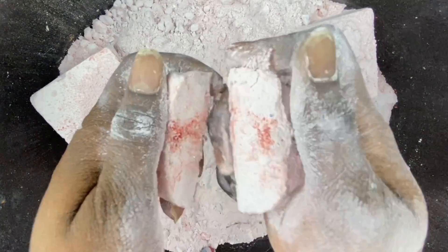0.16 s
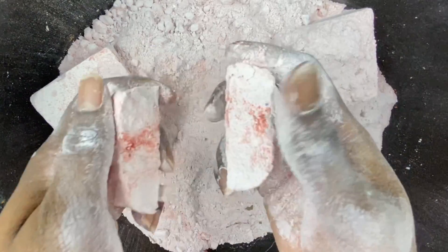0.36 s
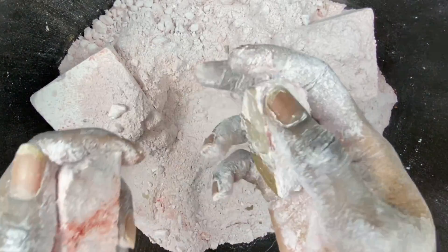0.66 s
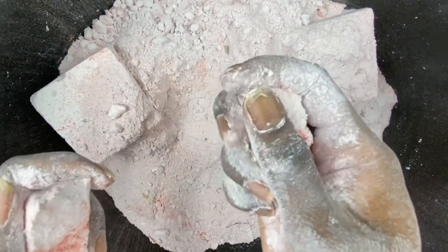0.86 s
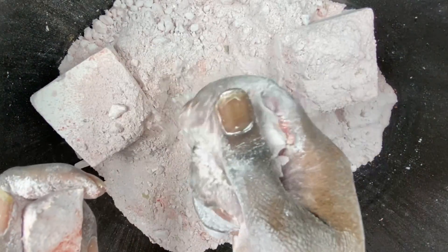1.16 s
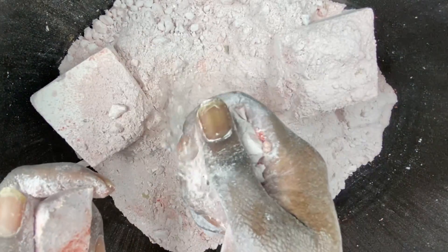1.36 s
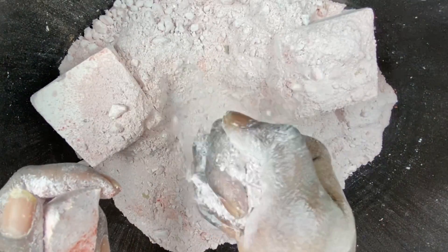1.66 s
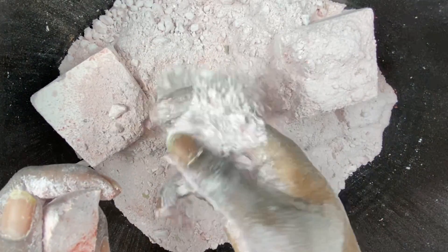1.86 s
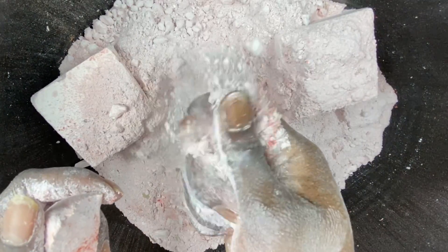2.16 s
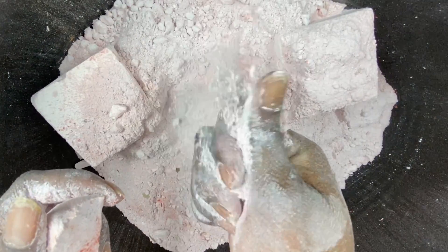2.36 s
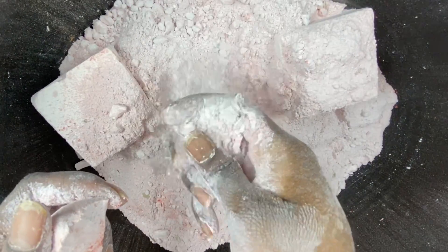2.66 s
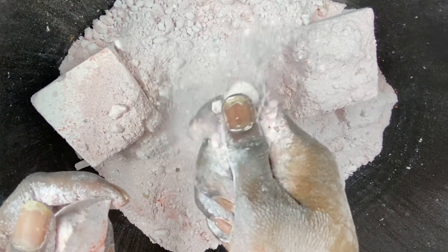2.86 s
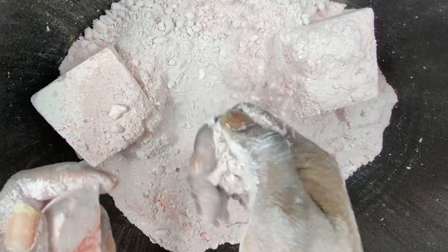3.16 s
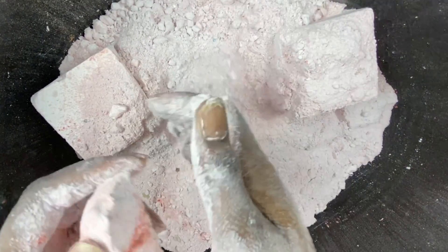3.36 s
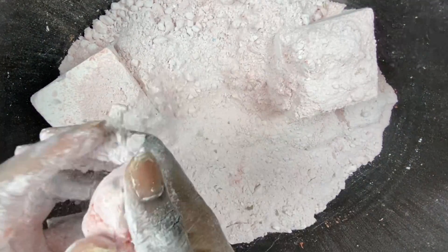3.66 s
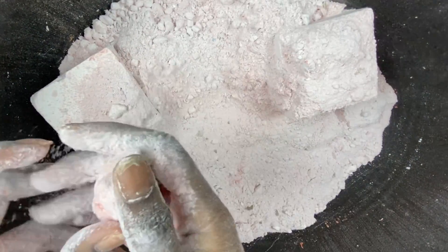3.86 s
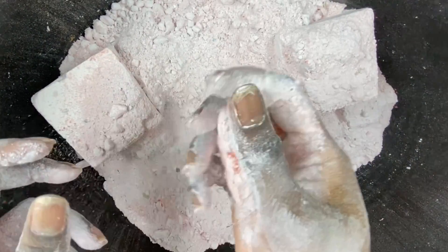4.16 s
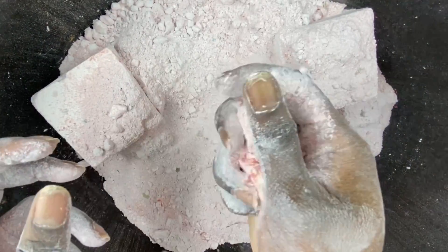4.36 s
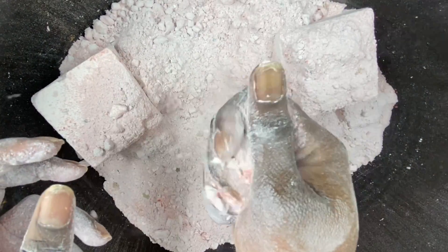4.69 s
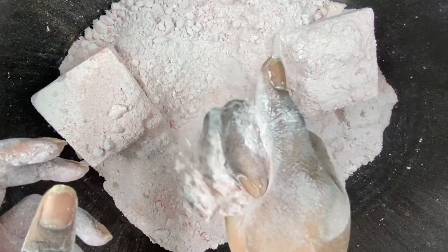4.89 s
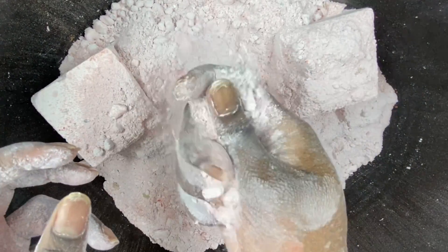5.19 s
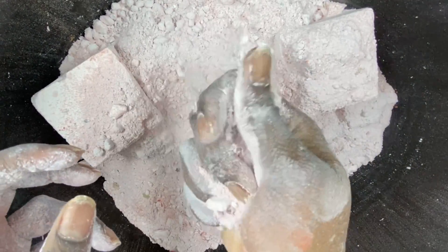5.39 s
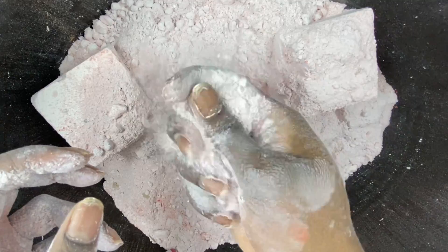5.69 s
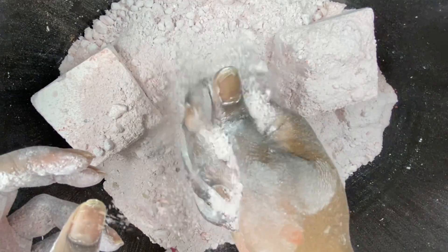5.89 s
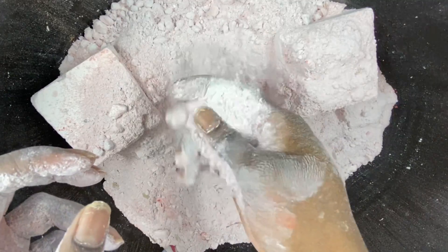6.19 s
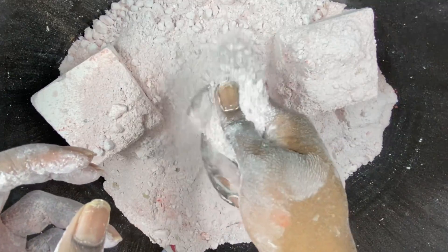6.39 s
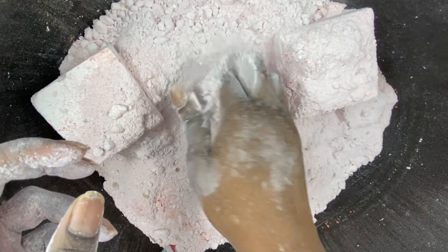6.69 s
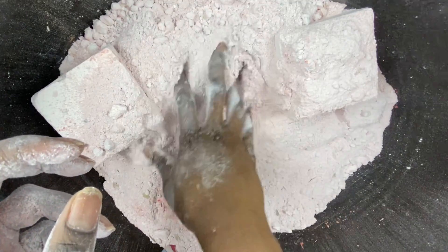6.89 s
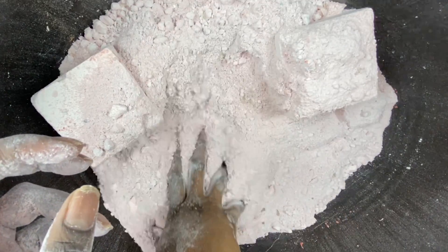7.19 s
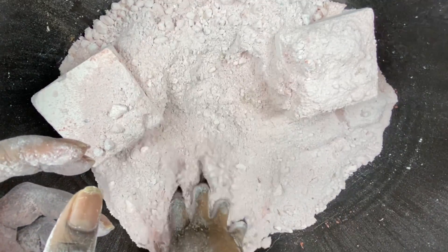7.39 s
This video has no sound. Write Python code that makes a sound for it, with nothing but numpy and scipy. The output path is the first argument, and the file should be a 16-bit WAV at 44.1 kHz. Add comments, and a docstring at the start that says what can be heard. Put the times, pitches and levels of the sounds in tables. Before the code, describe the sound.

Loud, brittle crunching of chalk squeezed by hand over a faint machine hum, with sharp cracks, falling crumbs and a final squeaky scrape through powder.

```python
"""A machine hums low in a small room; dusty fingers start to rub blocks of dry gym chalk.
The hand then snaps the blocks and grinds them to powder, close to an overloaded microphone; lumps drop
on the heap, and at last the hand digs down through it. Hum: unsteady sines over filtered noise.
Chalk: filtered random fractures and ringing crumbs under envelopes, with low decaying sines as thuds."""
import sys
import numpy as np
from scipy import signal
from scipy.fft import rfft, irfft, next_fast_len
from scipy.io import wavfile
from scipy.ndimage import uniform_filter1d, map_coordinates

SR = 44100
rng = np.random.default_rng(int(sys.argv[2]) if len(sys.argv) > 2 else 0)


def unload_wav(signal):
    """Save mono or channel-first audio to the path in sys.argv[1] as 16-bit WAV at rate SR, clipped to [-1, 1]."""
    wavfile.write(
        sys.argv[1],
        SR,
        np.round(np.clip(np.atleast_2d(signal).T, -1, 1) * 32767).astype(np.int16),
    )


N = 332514


def amp(db):
    """Decibels to gain."""
    return 10 ** (np.asarray(db) / 20)


def unit(x):
    """Scale to rms 1."""
    return x / np.sqrt(np.mean(x ** 2) + 1e-20)


def along(points, hz):
    """(f/Hz, value) points interpolated on a log frequency axis."""
    f, v = np.transpose(points)
    return np.interp(np.log(hz + 1), np.log(f + 1), v)


def gains(*tables):
    """One gain per sample for each dB column, tables summed; -120 dB outside each table."""
    t, total = np.arange(N) / SR, 0
    for rows in tables:
        s, *columns = np.transpose(rows)
        curves = [np.interp(t, s, db, left=-120, right=-120) for db in columns]
        total = total + np.array([amp(curve) for curve in curves])
    return uniform_filter1d(total, size=300, axis=1)


def strokes(rows, swell_db, attack_s, release_s):
    """One gain per dB column: each stroke of the hand sets in, swells to its crest, slackens and lets go."""
    t, out = np.arange(SR) / SR, np.zeros((len(rows[0]) - 3, N))
    for s, length_s, crest, *levels_db in rows:
        crest_s = np.clip(crest, 0, 1) * length_s
        effort_db = swell_db * np.interp(t, [0, crest_s, length_s], [-1, 0, -1])
        release_db = -60 * np.maximum(t - length_s, 0) / release_s
        shape = (1 - np.exp(-t / attack_s)) * amp(effort_db + release_db)
        for track, db in zip(out, levels_db):
            add(track, s, amp(db) * shape)
    return out


def wobble(rate_hz):
    """A smooth random curve, rate_hz knots a second."""
    knots = rng.standard_normal(int(N * rate_hz / SR) + 4)
    return map_coordinates(knots, [np.arange(N) * rate_hz / SR], order=2)


def colour(x, spectrum, size=8192):
    """Causal minimum-phase filter of unit power gain with the given spectrum."""
    cepstrum = irfft(np.log(amp(along(spectrum, np.fft.rfftfreq(size, 1 / SR)))))
    cepstrum[1:size // 2] *= 2
    cepstrum[size // 2 + 1:] = 0
    response = irfft(np.exp(rfft(cepstrum)))
    return signal.fftconvolve(x, response / np.linalg.norm(response))[:N]


def add(track, s, sound):
    """Mix a sound into the track at time s."""
    part = track[max(round(s * SR), 0):][:len(sound)]
    part += sound[:len(part)]


def fractures(rate_hz, spread_db):
    """Tiny breaks at random moments and of very unequal size, rms 1."""
    size = amp(spread_db * np.clip(rng.standard_normal(N), -2, 2))
    return unit((rng.random(N) < rate_hz / SR) * size * rng.choice([-1, 1], N))


def crumbs(rate_hz, pitch_hz, cycles, spread_db):
    """Crumbs giving way: each rings for a few cycles at a random pitch and with a random strength; rms 1."""
    draw = rng.random((int(rate_hz * N / SR), 4))
    t = np.arange(SR // 100) / SR
    hz = pitch_hz * 2 ** (2.96 * (draw[:, 1:2] - 0.5))
    strength = amp(spread_db * np.minimum(-np.log(draw[:, 2:3]), 3.5)) * np.sign(draw[:, 3:] - 0.5)
    rings = strength * np.sin(2 * np.pi * hz * t) * np.exp(-t * hz / cycles)
    at = (draw[:, :1] * N).astype(int) + np.arange(len(t))
    return unit(np.bincount(at.ravel(), rings.ravel(), N)[:N])


def slips(rate_hz, fade_s, spread_db):
    """Stress lets go in jerks: an envelope of sudden rises that fade exponentially, rms 1."""
    jerks = np.abs(fractures(rate_hz, spread_db))
    return unit(signal.lfilter([1], [1, -np.exp(-1 / (fade_s * SR))], jerks))


def shard(pitch_hz, cycles, share):
    """Response of one broken piece: the bare click plus a brief ring at a random pitch, unit energy."""
    t = np.arange(SR // 150) / SR
    hz = pitch_hz * 2 ** rng.uniform(-1.18, 1)
    ring = np.cos(2 * np.pi * hz * t) * np.exp(-t * hz / cycles)
    response = share * ring / np.linalg.norm(ring) + (t == 0)
    return response / np.linalg.norm(response)


# machine tones: f/Hz, rms level/dB
MACHINE_TONES = [(23.4, -33.5), (39.2, -21.5), (46.9, -28.5), (58.8, -33.5), (69.9, -34.5), (78.5, -37),
                 (120.0, -37.5), (157.4, -40)]
# rumble spectrum of the room: f/Hz, relative level/dB
AIR_SPECTRUM = [(10, 3), (30, 12), (90, 5), (180, -1.5), (300, 4), (340, -5), (380, 0), (420, -14),
                (700, -10.5), (1400, -18.5), (4000, -24.5), (11000, -26), (15500, -33)]


def background():
    """Machine sines with slowly wandering phase, over noise shaped to the rumble of the room."""
    t, tones = np.arange(N) / SR, 0
    for hz, db in MACHINE_TONES:
        phase = 2 * np.pi * (hz * t + rng.random()) + 0.48 * wobble(2.374)
        tones = tones + amp(db) * np.sqrt(2) * np.sin(phase)
    return tones + amp(-28.5) * colour(rng.standard_normal(N), AIR_SPECTRUM)


# fingers sliding over a block: t/s, length/s, crest/share of length, relative hiss/dB, relative squeak/dB
RUB_STROKES = [(0.05, 0.058, 0.39, -26, -40), (0.1, 0.12, 0.78, -22.5, -22), (0.23, 0.19, 0.14, -46, -38),
               (0.41, 0.027, 0.53, -19, -30), (0.455, .11, .25, -35, -27), (0.68, 0.053, 0.36, -36, -50),
               (3.1, 0.19, .6, -47, -35), (3.495, 0.098, 0.98, -25, -29), (3.63, 0.22, 0.62, -27.5, -30),
               (3.945, .175, 0.23, -36, -29), (4.165, 0.11, 0.86, -33.5, -27)]
# hiss spectrum of skin on chalk: f/Hz, relative level/dB
SKIN_SPECTRUM = [(300, -24), (1000, -14), (2000, -13), (3300, -5), (4500, -6), (6300, 0), (7400, -1),
                 (8800, 0), (11500, -3), (15500, -8)]
# thin squeaks of skin on chalk: centre f/Hz, knot rate of the random sidebands/Hz, share/1
SKIN_SQUEAK_BANDS = [(3470, 600, 0.22), (6100, 800, 0.36)]


def rubbing():
    """Dusty skin slides over chalk: an uneven hiss with thin squeaks that wander in pitch."""
    hiss_gain, squeak_gain = strokes(RUB_STROKES, swell_db=8.5, attack_s=0.0053, release_s=0.18)
    friction = hiss_gain * unit(colour(fractures(rate_hz=12000, spread_db=4), SKIN_SPECTRUM))
    for hz, knots_hz, share in SKIN_SQUEAK_BANDS:
        phase = 2 * np.pi * np.cumsum(hz * (1 + 0.035 * wobble(10))) / SR
        squeak = wobble(knots_hz) * np.cos(phase) + wobble(knots_hz) * np.sin(phase)
        friction = friction + share * squeak_gain * unit(squeak * amp(4.5 * wobble(45)))
    return amp(4.0) * friction * unit(amp(4.4 * wobble(130)))


# cracks running through the chalk: t/s, relative crisp level/dB, relative body level/dB, run/s
CRACKS = [(0.1932, -20, -15.5, 0.014), (0.4687, -22, -23, 0.014), (0.5262, -18.5, -22, 0.02),
          (0.6557, -16.5, -27.5, 0.017), (0.745, -8.5, -29, 0.0097), (0.785, -1.5, -15, 0.029),
          (0.852, -10, -22, 0.04), (0.8825, -6.5, -15, 0.045), (0.9062, -2, -5.5, 0.025),
          (0.9388, 1, -2.5, 0.055), (0.9589, -6, -6.5, 0.028), (1.1139, -16, -11, 0.035),
          (1.1566, -13, -23, 0.022), (1.336, -8, -13.5, 0.015), (1.521, -10, -19.5, 0.038),
          (1.6467, -9, -19.5, 0.028), (1.6902, -15.5, -42, .022), (1.942, -9, -12.5, 0.041),
          (2.075, -14, -18, 0.033), (2.1463, -10, -21, 0.017), (2.3131, -16, -27, .03),
          (2.339, -6, -36, 0.02), (2.558, -25, -16.5, 0.043), (2.5968, -17, -21, 0.013),
          (2.6835, -1, -7.5, 0.053), (2.8651, -10, -10, 0.032), (2.9371, -16.5, -21, 0.029),
          (3.0034, -11, -18, 0.041), (3.0369, -13, -9.5, 0.0096), (3.1755, -17.5, -22, 0.03),
          (3.3329, -27, -12, 0.021), (3.4347, -15, -17, 0.019), (3.532, -14, -22.5, 0.032),
          (4.1145, -16, -27, .012), (4.2153, -1.5, -14, 0.021), (4.276, -1, -10, 0.043),
          (4.3469, 9, 2.5, 0.053), (4.3787, -5, -6, .028), (4.3898, 1, -3, 0.022), (4.4052, 2, -1.5, 0.022),
          (4.4243, -4, -19, .015), (4.467, -13, -13, 0.017), (4.49, -2, -8, 0.01),
          (4.5098, -4.5, -11.5, 0.019), (4.5387, -5, -3.5, 0.016), (4.5578, -19, -15, 0.0092),
          (4.5778, -6, -18, 0.018), (4.5958, -1, -8.5, 0.012), (4.6133, -8.5, -22, 0.046),
          (5.0473, -11, -17, 0.015), (5.1014, -21, -8, .022), (5.2186, -4, -13.5, 0.019),
          (5.6354, -10, -10.5, 0.011), (5.9576, -15.5, -17, 0.028), (6.2817, -11.5, -11, 0.014),
          (6.315, -6, -32, 0.0058), (6.3305, -19, -12, 0.017), (6.3989, -16, -13.5, 0.022),
          (6.65, -12, -13.5, .025), (6.6782, -28, -11.5, 0.017), (7.3246, -15, -6.5, 0.016)]
# bright part of a crack: f/Hz, relative level/dB
CRISP_SPECTRUM = [(1200, -18.5), (2800, 0.5), (4000, 3), (5000, 1.5), (7000, 1.5), (10000, -3), (15500, -6)]
# body of the block: f/Hz, relative level/dB
BODY_SPECTRUM = [(250, -11), (420, -13), (580, 2.5), (720, 2), (900, -1.5), (1300, 1.5), (2400, -1),
                 (3500, -14.5), (7000, -70)]
# low thump of the block: f/Hz, relative level/dB
THUMP_SPECTRUM = [(50, -3), (105, -3.5), (180, -3), (290, 0), (420, -12.5), (900, -24.5), (3000, -100)]
# thump over body at the usual run, and its rise per doubling of the run
THUMP_DB, USUAL_RUN_S, THUMP_DB_PER_DOUBLING = 1, 0.033, 2.5


def snaps():
    """A crack opens with a tick, spreads as an avalanche of fractures and runs out; long ones thump more."""
    t = np.arange(SR // 8) / SR
    drive = np.zeros((3, N))
    breaks = fractures(rate_hz=7000, spread_db=3.5)
    for s, crisp_db, body_db, run_s in list(CRACKS) + small_cracks():
        thump_db = body_db + THUMP_DB + THUMP_DB_PER_DOUBLING * np.log2(run_s / USUAL_RUN_S)
        age = t / max(run_s, 0.004)
        swell = amp(-75 * age ** 1.25) * (1 - 0.53 * np.exp(-age / 0.047))
        burst = breaks[rng.integers(N - len(t)):][:len(t)] * swell
        burst[0] += 6  # opening tick
        burst *= np.linalg.norm(swell) / np.linalg.norm(burst)
        # the piece that breaks off colours the bright part
        bright = np.convolve(burst, shard(pitch_hz=4800, cycles=1.3, share=0.28))
        add(drive[0], s, amp(crisp_db) * bright)
        add(drive[1], s, amp(body_db) * burst)
        add(drive[2], s, amp(thump_db) * burst)
    crisp = amp(-1) * colour(drive[0], CRISP_SPECTRUM)
    body = amp(2.0) * colour(drive[1], BODY_SPECTRUM)
    thump = amp(1.0) * colour(drive[2], THUMP_SPECTRUM)
    return crisp + body + thump


# fist closing on the pieces: t/s, length/s, crest/share of length, relative crunch/dB, relative grit/dB
FIST_SQUEEZES = [(0.78, 0.36, 0.8, -24.5, -23), (1.205, 0.052, .3, -32, -28),
                 (1.33, 0.12, 0.33, -25, -22.5), (1.48, 0.09, 0.16, -25.5, -24),
                 (1.66, 0.17, 0.16, -47, -34), (1.855, 0.35, 0.56, -21.5, -23.5),
                 (2.2, 0.14, 0.79, -26.5, -29.5), (2.385, 0.065, 0.37, -35, -30),
                 (2.535, 0.11, 0.15, -26.5, -25.5), (2.645, .23, 0.19, -21, -25.5),
                 (2.92, 0.083, 0.99, -40, -32), (3.095, 0.2, 0.42, -53, -35),
                 (3.285, 0.26, 0.25, -31, -32.5), (4.27, 0.22, 0.73, -30, -26.5),
                 (4.47, 0.39, .12, -25.5, -22.5), (4.925, 0.42, 0.36, -24.5, -25.5),
                 (5.425, 0.091, 0.17, -37, -35.5), (5.565, .09, .6, -25, -36),
                 (5.68, 0.081, 0.26, -21, -31), (5.815, .19, 0.55, -27.5, -29),
                 (6.135, 0.14, 0.47, -25, -39), (6.28, 0.16, 0.5, -32.5, -32.5),
                 (6.435, 0.14, 0.091, -34.5, -29), (6.645, 0.082, 0.66, -21.5, -34)]
# loose powder trickling from the hand: start t/s, end t/s, relative level/dB
POWDER_TRICKLE = [(0.78, 3.5, -46), (4.25, 6.85, -44)]


def squeezing():
    """Gains of crunch and grit: the squeezes over a steady trickle of powder."""
    trickle = gains(*[[(start, db), (end, db)] for start, end, db in POWDER_TRICKLE])
    return trickle + strokes(FIST_SQUEEZES, swell_db=10, attack_s=0.0027, release_s=0.2)


SMALL_PER_S, SMALL_DB, SMALL_SCATTER_DB, SMALL_RUN_S = 22, 9.0, 3.0, 0.009


def small_cracks():
    """Chance cracks whose levels follow the squeeze of the moment, with scatter: rows like CRACKS."""
    count = int(SMALL_PER_S * N / SR)
    at = rng.integers(N, size=count)
    scatter_db = SMALL_SCATTER_DB * rng.standard_normal((count, 2)).T
    crunch_db, grit_db = 20 * np.log10(squeezing()[:, at]) + SMALL_DB + scatter_db
    return [(i / SR, crisp, body, SMALL_RUN_S) for i, crisp, body in zip(at, grit_db, crunch_db)]


# muffled crunch inside the fist: f/Hz, relative level/dB
CRUNCH_SPECTRUM = [(60, -14), (150, 5.5), (290, 4), (430, -8), (680, 2.5), (880, -9), (1600, 3.5),
                   (2600, -3), (4500, -8.5), (10000, -14)]
# fine grit at the surface: f/Hz, relative level/dB
GRIT_SPECTRUM = [(1200, -21), (3000, 1.5), (5000, 0.5), (6800, 0.5), (10000, -5), (15500, -15.5)]


def crumbling():
    """Pieces grind in the fist: a muffled crunch inside, fine grit at the surface, both in the same jerks."""
    crunch_gain, grit_gain = squeezing()
    jerks = unit(1.16 + slips(rate_hz=170, fade_s=0.003, spread_db=2.5))
    coarse = colour(fractures(rate_hz=4000, spread_db=4.5), CRUNCH_SPECTRUM)
    coarse = coarse + 0.6 * crumbs(rate_hz=300, pitch_hz=2000, cycles=1.6, spread_db=3.7)
    fine = colour(fractures(rate_hz=3500, spread_db=5.5), GRIT_SPECTRUM)
    fine = fine + 0.5 * crumbs(rate_hz=350, pitch_hz=5600, cycles=1.8, spread_db=4.5)
    # sparser, larger grains
    crackle = 0.22 * colour(fractures(rate_hz=78, spread_db=5), CRISP_SPECTRUM)
    # coarse chips clack with a short ring of their own
    chips = 0.45 * crumbs(rate_hz=60, pitch_hz=2300, cycles=3.5, spread_db=5.0)
    grinding = jerks * (amp(1.1) * crunch_gain * unit(coarse) + amp(0.86) * grit_gain * unit(fine))
    return grinding + grit_gain * crackle + crunch_gain * chips


# low thuds as blocks give way, lumps land or the heap is pressed: t/s, relative level/dB, f/Hz, t60/s
LOW_THUDS = [(0.908, -14, 170, 0.038), (1.119, -11.5, 287, 0.041), (2.866, -6, 122, 0.077),
             (4.278, -5, 200, 0.045), (5.695, -18, 209, 0.19), (6.925, 1, 28, 0.27),
             (7.096, -9.5, 298, 0.083), (7.22, -2.5, 224, 0.081), (7.434, 1.5, 127.5, 0.11),
             (7.488, -2.5, 72, 0.32)]


def thuds():
    """Soft, low thuds: decaying sines with a soft onset."""
    t, out = np.arange(SR // 3) / SR, np.zeros(N)
    for s, db, hz, t60_s in LOW_THUDS:
        envelope = amp(db + 5.5 - 60 * t / t60_s) * (1 - np.exp(-t * hz))
        add(out, s, envelope * np.sin(2 * np.pi * hz * t))
    return out


# single hard grains bursting under the fingers: t/s, relative level/dB
GRAIN_TICKS = [(1.53, 8), (1.5648, -3), (2.341, -2), (2.8082, 2), (2.8571, 3), (3.0034, 3), (4.29, 12),
               (4.3223, 0), (4.558, 4), (4.715, 3), (5.8207, -14)]


def ticks():
    """A hard grain bursts in one sharp click with a brief ring."""
    clicks = np.zeros(N)
    for s, db in GRAIN_TICKS:
        add(clicks, s, amp(db + 0.5) * shard(pitch_hz=6350, cycles=2.8, share=0.91))
    return colour(clicks, GRIT_SPECTRUM)


# lumps knocking on the heap: t/s, relative level/dB, nominal f/Hz
FALLING_LUMPS = [(1.6463, -5.5, 940), (1.7435, -14, 1260), (2.131, -14, 1490), (2.8131, -10, 1250),
                 (2.8646, -6, 720), (2.9363, -8, 1120), (4.4055, 4.5, 1240), (5.2167, -4, 1150),
                 (5.2675, -17.5, 950), (5.616, -15, 1780), (5.704, -13.5, 700)]
# knock spectrum of a lump: f/nominal f, relative level/dB
KNOCK_SPECTRUM = [(.1, -20), (.35, -20.5), (.58, -15), (.76, -1), (1, -1.5), (1.3, -5), (1.7, -14),
                  (4, -51)]
# hollows of the tray under the heap: f/Hz, relative level/dB
TRAY_SPECTRUM = [(300, 2), (480, -1), (720, 5.5), (870, -13.5), (1050, 0), (1280, -1), (1600, -2),
                 (2200, 2), (5000, 1)]


def lumps():
    """A falling lump lands with a dull knock and settles in quick contacts, coloured by the tray."""
    t, out = np.arange(SR // 20) / SR, np.zeros(N)
    contacts = fractures(rate_hz=5000, spread_db=-0.5)
    for s, db, hz in FALLING_LUMPS:
        settle = amp(-60 * t / 0.03) * (1 - np.exp(-t / 0.00033))
        blow = contacts[rng.integers(N - len(t)):][:len(t)] * settle
        lump_spectrum = [(ratio * hz, level_db) for ratio, level_db in KNOCK_SPECTRUM]
        knock = colour(colour(blow, lump_spectrum), TRAY_SPECTRUM)
        add(out, s, amp(db + 1) * knock * np.linalg.norm(settle) / np.linalg.norm(knock))
    return out


# hand digging in the heap: t/s, relative push/dB, relative scrape/dB
DIG_LEVELS = [(6.74, -19, -38), (6.892, -8.5, -24.5), (6.99, -11.5, -30), (7.152, -12.5, -11.5),
              (7.242, -14, -32), (7.342, -17, -24.5), (7.398, -11.5, -33.5), (7.44, -5, -26),
              (7.54, -6.5, -20.5)]
# squeaks where the fingers force through: t/s, length/s, crest/share of length, relative level/dB
POWDER_SQUEAKS = [(7.045, 0.051, 0.44, -10.5), (7.12, 0.052, 0.66, -17)]
# low shove of the heap: f/Hz, relative level/dB
PUSH_SPECTRUM = [(15, -18), (28, -4), (70, 3), (110, -8), (280, -5.5), (430, -19), (720, -14.5),
                 (1100, -25), (3000, -50.5)]
# scrape of packed powder: f/Hz, relative level/dB
SCRAPE_SPECTRUM = [(300, 2), (700, -8), (1800, -1.5), (2800, 1), (4200, -6.5), (7000, -12), (15500, -30)]
# creak and squeak of packed powder: f/Hz, relative level/dB
SQUEAK_SPECTRUM = [(500, -40), (980, -10.5), (1200, -0.5), (1450, -8), (1800, -8), (4000, -42.5)]


def digging():
    """The hand shoves the heap; packed powder scrapes and squeaks as it sticks and slips."""
    push_gain, scrape_gain = gains(DIG_LEVELS)
    squeak_gain = strokes(POWDER_SQUEAKS, swell_db=9.0, attack_s=0.0078, release_s=0.039)[0]
    creak_gain = amp(3.0) * scrape_gain + squeak_gain
    jerks = unit(1.0 + slips(rate_hz=140, fade_s=0.0075, spread_db=1.0))
    low = amp(-2.0) * push_gain * colour(fractures(rate_hz=2500, spread_db=4.5), PUSH_SPECTRUM)
    grains = colour(fractures(rate_hz=5000, spread_db=2.0), SCRAPE_SPECTRUM)
    grains = grains + 0.57 * crumbs(rate_hz=300, pitch_hz=1880, cycles=1.6, spread_db=7.5)
    creak = creak_gain * colour(fractures(rate_hz=980, spread_db=4.0), SQUEAK_SPECTRUM)
    return low + jerks * (amp(2.5) * scrape_gain * unit(grains) + creak)


# decay of the room: f/Hz, t60/s
ROOM_T60 = [(200, 0.1), (1500, 0.15), (10000, 0.069)]


def room(x):
    """A short diffuse answer from the small room: noise decaying at a rate set by frequency."""
    hz, t, z = signal.stft(rng.standard_normal(SR // 3), SR, nperseg=256)
    decay = amp(-60 * t / along(ROOM_T60, hz)[:, None])
    tail = signal.istft(z * decay, SR, nperseg=256)[1]
    delayed = np.pad(tail / np.linalg.norm(tail), (SR // 400, 0))  # 2.5 ms
    return signal.fftconvolve(x, delayed)[:N]


def scene():
    """All the chalk sounds, close, with a faint room answer, over the hum and rumble."""
    chalk = snaps() + ticks() + crumbling() + lumps() + rubbing() + digging() + thuds()
    return (chalk + amp(-19) * room(chalk) + background())[None]


TOP_HZ = 15750


def record(dry):
    """The overloaded microphone clips peaks at full scale; then all from TOP_HZ up is removed."""
    clipped = np.clip(dry, -1, 1)
    size = next_fast_len(N + SR // 2)
    passband = np.fft.rfftfreq(size, 1 / SR) < TOP_HZ
    return irfft(rfft(clipped, size) * passband, size)[:, :N]


dry = scene()
out = record(dry)
unload_wav(out)
```